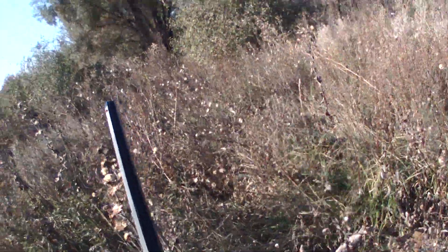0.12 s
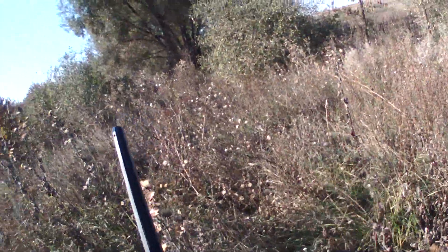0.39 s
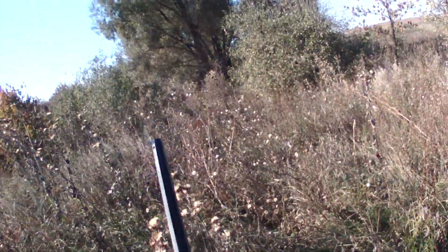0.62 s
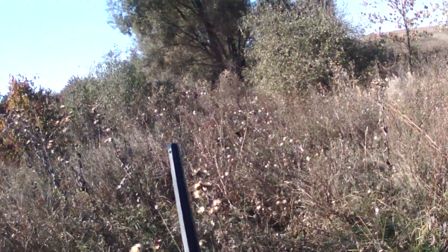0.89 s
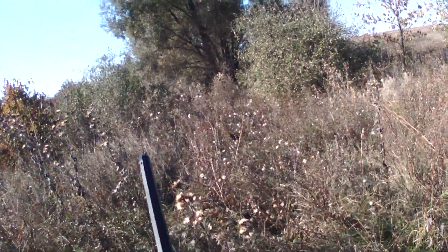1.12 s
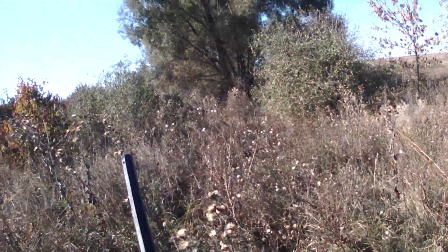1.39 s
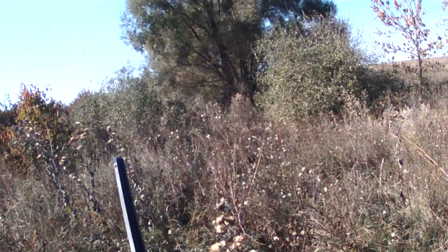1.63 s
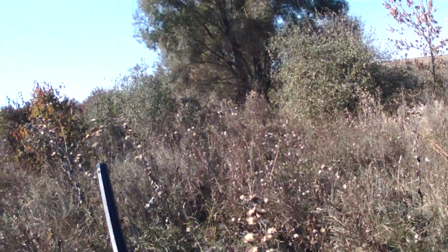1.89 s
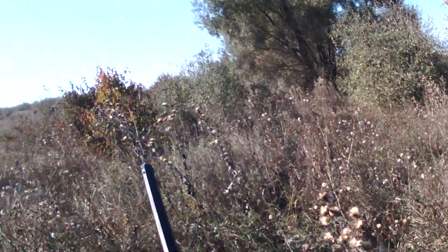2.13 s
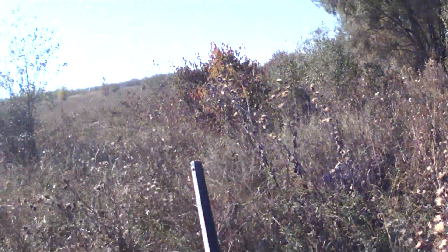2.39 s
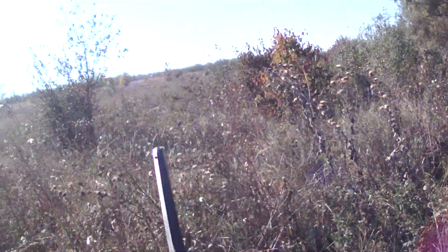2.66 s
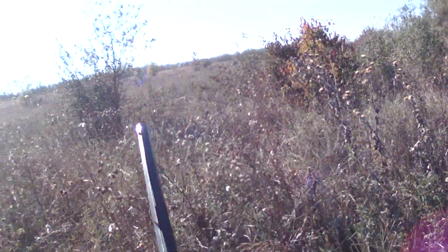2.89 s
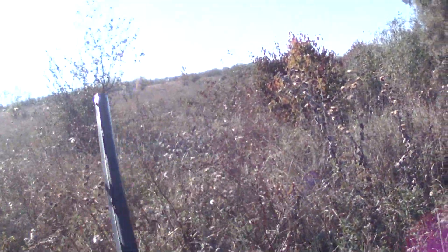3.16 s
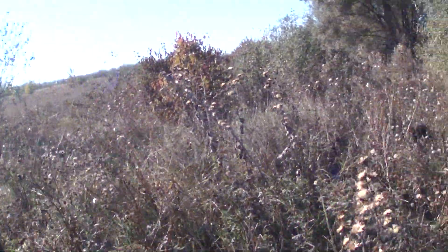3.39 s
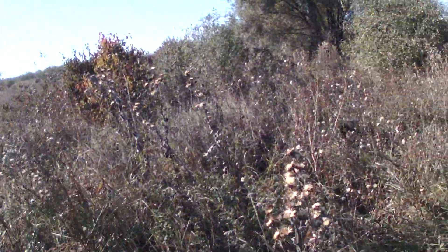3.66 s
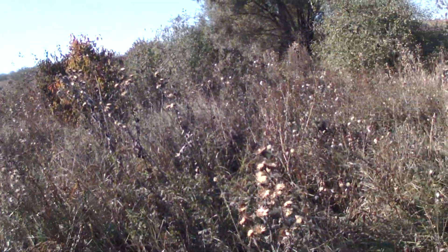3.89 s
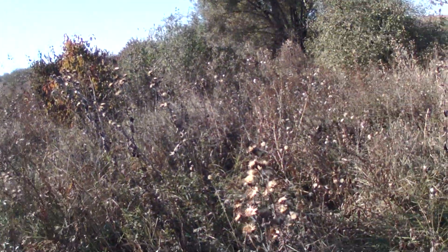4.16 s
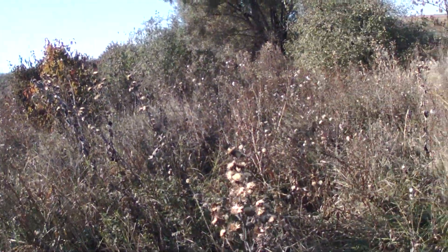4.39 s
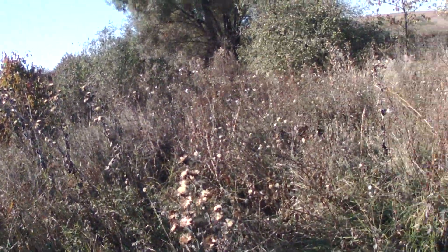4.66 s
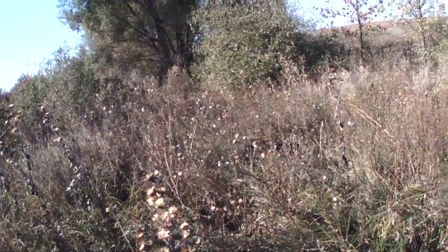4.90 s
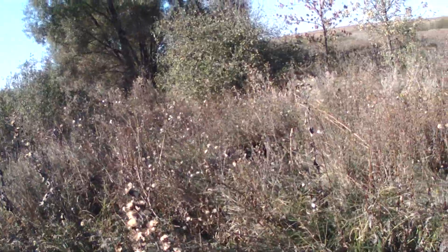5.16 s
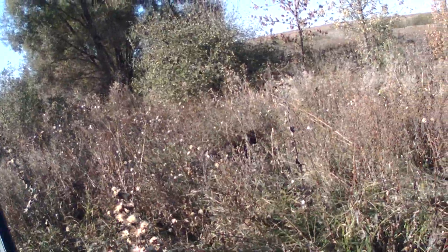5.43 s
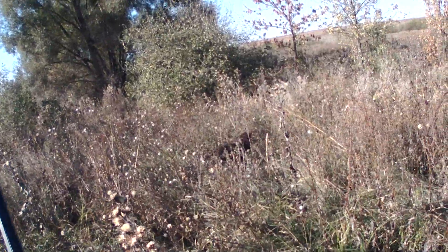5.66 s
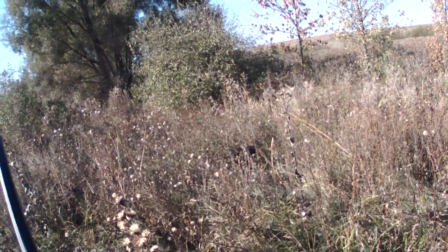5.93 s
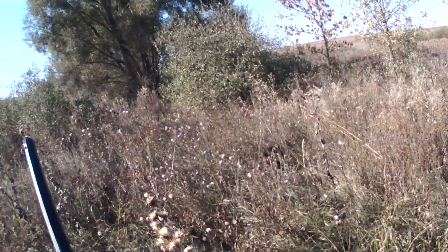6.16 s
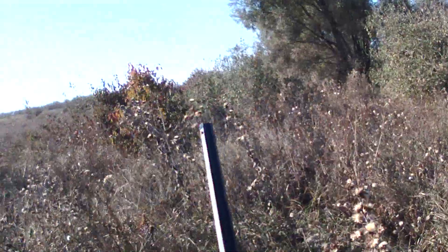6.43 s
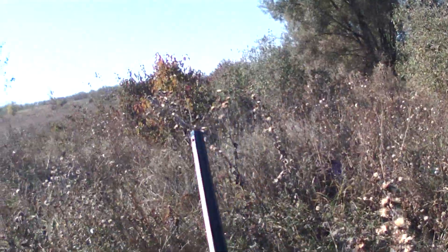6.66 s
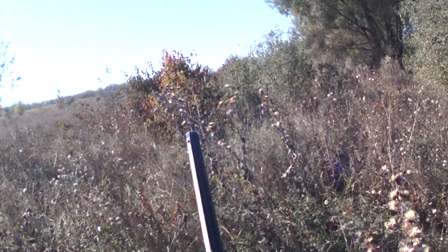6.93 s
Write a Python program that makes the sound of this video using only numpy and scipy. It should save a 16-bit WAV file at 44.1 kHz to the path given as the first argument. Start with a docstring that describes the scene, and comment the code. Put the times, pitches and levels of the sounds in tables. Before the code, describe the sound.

Dry grass and weeds swish and crackle as someone pushes through, stems snapping sharply, with a few hard knocks on the microphone case.

```python
"""Dry blades brush and crackle in dense grains as someone pushes on foot through tall grass in open country.
Stems snap close by, and now and then something knocks the cased microphone worn on the body.
Brushing is shaped noise under random contact grains, snaps are short noise bursts with a ring,
knocks are clicks ringing the case, and faint low air lies beneath.
The case lifts 1-3 kHz, the microphone port lifts the top treble; both channels are nearly alike."""
import sys
import numpy as np
from scipy import signal
from scipy.fft import rfft, irfft
from scipy.io import wavfile
from scipy.ndimage import uniform_filter1d

SR = 44100
rng = np.random.default_rng(int(sys.argv[2]) if len(sys.argv) > 2 else 0)


def unload_wav(signal):
    """Save mono or channel-first audio to the path in sys.argv[1] as 16-bit WAV at rate SR, clipped to [-1, 1]."""
    wavfile.write(
        sys.argv[1],
        SR,
        np.round(np.clip(np.atleast_2d(signal).T, -1, 1) * 32767).astype(np.int16),
    )


def ratio(d):
    """dB to gain"""
    e = np.asarray(d, float) / 20
    return 10 ** e


N = 310905

# spectrum of grass heard through the case: frequency_hz, relative_density_db
THROUGH_CASE = [(18, -68.5), (30, -47), (59, -15.5), (95, -18), (247, -19), (337, -18.5), (667, -16),
                (1100, 2.5), (1270, 1), (2210, -4), (2780, -1), (3140, -2.5), (3790, -19.5), (4200, -18.5),
                (5460, -30.5), (9240, -120)]


def rms_one(x):
    """Scale to rms 1."""
    return x / np.sqrt(np.mean(x ** 2) + 1e-20)


def response(points, size=2048):
    """Causal (minimum-phase) impulse response of a spectrum, energy 1."""
    hz, db = np.transpose(points)
    grid_hz = np.maximum(np.arange(size // 2 + 1) * SR / size, 1)
    log_gain = np.log(ratio(np.interp(np.log(grid_hz), np.log(hz), db)))
    cepstrum = irfft(log_gain)
    # folding the cepstrum onto its first half gives minimum phase
    cepstrum[1:size // 2] *= 2
    cepstrum[size // 2 + 1:] = 0
    out = irfft(np.exp(rfft(cepstrum)))
    return out / np.sqrt(np.sum(out ** 2))


def drift(rate_hz):
    """Slow random curve of spread 1: noise through two equal poles, drawn at every 40th sample."""
    r = np.exp(-80 * np.pi * rate_hz / SR)
    noise = rng.standard_normal(N // 40 + 2002)
    slow = signal.lfilter([1], [1, -2 * r, r * r], noise)[2000:]  # the start has settled
    return np.interp(np.arange(N) / 40, np.arange(len(slow)), rms_one(slow))


def ring(x, hz, t60_s):
    """A resonance: a unit click sets a decaying sine of height 1 ringing."""
    r = ratio(-60 / (t60_s * SR))
    w = 2 * np.pi * hz / SR
    return signal.lfilter([0, np.sin(w)], [1, -2 * r * np.cos(w), r * r], x)


def add(out, start_s, sound, peak_db):
    """Mix a short sound in at a time, scaled to a peak."""
    i = round(start_s * SR)
    scaled = ratio(peak_db) * sound / np.abs(sound).max()
    out[i:i + len(sound)] += scaled[:N - i]


def vigour():
    """Levels in dB of stalks and tips: the rustle plus every sweep, added as power."""
    # steady rustle of the grass all round, fading as the walk slows: time_s, stalks_db, tips_db
    rustle = [(0.0, -48, -43.5), (0.8, -44.5, -40), (1.3, -45.5, -37), (1.74, -55.5, -47), (2.3, -48, -37),
              (2.95, -46.5, -39.5), (3.5, -49.5, -42.5), (3.95, -50.5, -45.5), (4.25, -50.5, -44.5),
              (4.9, -55, -50), (5.9, -53, -50), (6.5, -57, -52), (7.05, -58, -56.5)]
    # leg or arm through a clump, swelling and letting go: peak_s, swell_s, release_s, stalks_db, tips_db
    sweeps = [(0.09, 0.2, 0.12, -43.5, -45), (0.15, 0.15, 0.058, -62, -35.5),
              (0.35, 0.063, .06, -44.5, -53), (0.56, .03, 0.083, -45, -42), (0.69, 0.11, 0.055, -37, -32),
              (0.87, 0.18, 0.048, -43.5, -43.5), (1.0, 0.068, 0.058, -59, -41),
              (1.14, 0.095, 0.087, -41, -33.5), (1.6, 0.21, 0.17, -43.5, -32),
              (1.83, 0.13, 0.26, -46.5, -37), (2.07, 0.12, 0.09, -43.5, -28.5),
              (2.18, 0.047, 0.082, -47.5, -34), (2.46, 0.04, .15, -51, -34.5),
              (2.66, 0.057, 0.035, -48, -35), (3.2, 0.12, 0.068, -43, -41), (3.33, 0.15, 0.025, -48, -47),
              (3.45, 0.02, 0.075, -50.5, -40), (3.79, .2, 0.15, -44.5, -36.5),
              (4.04, 0.055, 0.03, -48, -42.5), (4.42, 0.08, 0.1, -45, -38.5),
              (4.61, 0.19, 0.099, -46, -43.5), (4.81, 0.12, 0.027, -55.5, -49.5),
              (5.0, 0.02, 0.087, -52, -47), (5.24, 0.13, 0.097, -49, -49.5), (5.54, 0.12, 0.082, -52, -52),
              (5.81, 0.15, 0.025, -54, -55), (6.23, 0.36, 0.095, -51.5, -48.5), (6.4, 0.12, 0.07, -47, -49),
              (6.68, 0.12, 0.07, -56, -48), (6.98, 0.04, 0.13, -71, -56)]
    t = np.arange(0, N, 64) / SR
    times, *levels = np.transpose(rustle)
    power = np.array([ratio(2 * np.interp(t, times, db)) for db in levels])
    for peak_s, swell_s, release_s, *sweep_db in sweeps:
        away = np.where(t < peak_s, (peak_s - t) / swell_s, (t - peak_s) / release_s)
        hump = np.cos(np.pi / 2 * np.clip(away, 0, 1)) ** 2
        power = power + np.outer(ratio(2 * np.array(sweep_db)), hump)
    return [np.interp(np.arange(N) / SR, t, 10 * np.log10(p)) for p in power]


def crackle(per_s, spread_db, decay_s):
    """Envelope of blade contacts: random in time, uneven in size, quick to die."""
    sizes = ratio(spread_db * np.minimum(rng.exponential(1, N), 4))
    born = rng.random(N) < per_s * ratio(3.0 * drift(15)) / SR
    r = np.exp(-1 / (decay_s * SR))
    return rms_one(signal.lfilter([1], [1, -r], sizes * born + 1e-18))


def brushing(stalk_db, tips_db):
    """A smooth swish plus contact grains; stalks, leaves and tips share some grains and have their own."""
    # leaves scraping: frequency_hz, relative_density_db
    leaf_colour = [(2350, -12), (4000, -11), (5180, -4), (5790, -8), (7270, -0.5), (9000, -10.5),
                   (11700, -25), (19800, -120)]
    # finest blade tips, lifted by the port: frequency_hz, relative_density_db
    tips_colour = [(5290, -66), (9000, -21.5), (9970, -16.5), (11000, -5.5), (12500, 1), (14600, 3),
                   (15800, -1)]
    leaf_db = 0.39 * stalk_db + .7 * tips_db - 9  # leaf scrape follows both
    shared = crackle(per_s=130.0, spread_db=11.0, decay_s=0.0049)
    sway = drift(3.66)
    layers = (THROUGH_CASE, stalk_db, .5), (leaf_colour, leaf_db, .3), (tips_colour, tips_db, .3)
    out = 0
    for colour, level_db, own in layers:
        touch = 1 + 0.091 * shared + own * crackle(per_s=140.0, spread_db=4.5, decay_s=0.0037)
        swaying = touch * ratio(1.9 * sway + 0.45 * drift(5.3))
        noise = rms_one(swaying) * rng.standard_normal(N)
        out = out + ratio(level_db) * signal.fftconvolve(noise, response(colour))[:N]
    return out


def snaps(rows):
    """A stem gives way in a short run-up, cracks, and sheds splinters; its hollow rings briefly."""
    # snaps heard through the port: frequency_hz, relative_density_db
    through_port = [(2350, -100), (4000, -37), (5200, -3.5), (5700, -17), (6580, -18), (7250, -6),
                    (7950, -8), (8860, -42), (10100, -10), (11100, 3), (12300, 3), (14800, 12), (15700, 1)]
    husk_hz, husk_t60_s = 7250, 0.0031  # dry leaf sheath tearing with a snap
    out, t = np.zeros(N), np.arange(2048) / SR
    body, port = response(THROUGH_CASE), response(through_port)
    deep = signal.butter(2, 450., fs=SR, output="sos")
    crack = round(.0016 * SR)
    fibres = rng.standard_normal((len(rows), 3, len(t)))
    for (start_s, stalk_db, treble_db, hz, t60_s), (low, high, puff) in zip(rows, fibres):
        after = np.maximum(t - t[crack], 0)
        run_up = np.minimum(t / t[crack], 1) ** 3.8
        splinters = 0.024 * ratio(-60 * after / (8.6 * t60_s))
        shape = run_up * (ratio(-60 * after / t60_s) + splinters)
        low[crack:crack + 4], high[crack] = 3.0, 4.0  # the break itself is one hard edge
        # a thin stem radiates little below its ring
        thin = signal.butter(2, 1.27 * hz, "high", fs=SR, output="sos")
        stem = signal.sosfilt(thin, low * shape)
        hollow = rms_one(ring(stem, hz, .007))
        stem = rms_one(signal.fftconvolve(stem, body))[:len(t)] + 1.1 * hollow
        add(out, start_s, stem, stalk_db)
        add(out, start_s, signal.fftconvolve(high * shape, port)[:len(t)], treble_db)
        husk = ring(np.diff(puff * shape), husk_hz, husk_t60_s)
        add(out, start_s, husk, 1.38 * treble_db - 11)
        # air pushed at the port, stronger for bright and for long snaps
        puff_db = 1.54 * treble_db - 35.5 + 400. * min(t60_s, .025)
        add(out, start_s, signal.sosfilt(deep, puff * shape), puff_db)
    return out


def twigs(stalk_db, tips_db):
    """Rows of small snaps at random moments, their peaks set above the brushing of that moment."""
    count, spread_db, t60_s = 30, 4, 0.0059
    low_hz, high_hz = 1120, 2870
    when, pitch, low, high = rng.random((count, 4)).T
    i = (when * (N - 1)).astype(int)
    stalk_peak_db = stalk_db[i] + 10 + spread_db * (2 * low - 1)
    treble_peak_db = tips_db[i] + 19.5 + spread_db * (2 * high - 1)
    ring_hz = low_hz * (high_hz / low_hz) ** pitch
    return [*zip(i / SR, stalk_peak_db, treble_peak_db, ring_hz, np.full(count, t60_s))]


def knocks():
    """A rounded touch and its rebound ring the modes of the case; a hard contact also ticks."""
    # knocks on the case: start_s, peak_db, rebound_delay_ms, hardness_hz, tick_under_peak_db
    case_knocks = [(0.609, -19.5, 2.1, 1190, -45), (2.147, -6, 2.087, 2550, -48),
                   (6.2852, -1.5, 2.085, 3030, -14)]
    # modes of the case: frequency_hz, relative_level_db, t60_s
    case_modes = [(514, -22.5, .03), (965, -4.5, 0.022), (1570, -7, 0.022), (1870, -10.5, 0.0074),
                  (2340, -1, 0.0094), (2700, -5.5, 0.014), (2785, -6, 0.013), (3150, 4.5, 0.012)]
    out = np.zeros(N)
    high_pass = signal.butter(2, 600., "high", fs=SR, output="sos")
    for start_s, peak_db, later_ms, hard_hz, tick_db in case_knocks:
        touch = np.zeros(2048) + 1e-18
        touch[[0, 14, 14 + int(later_ms * SR / 1000)]] = -.3, 1.0, .6  # graze, blow, rebound
        soft = signal.butter(3, hard_hz, fs=SR, output="sos")
        touch = signal.sosfilt(soft, touch)
        rings = 0
        for k, (hz, db, t60_s) in enumerate(case_modes):
            # the two lowest modes move in step, which leaves a gap between them; the rest alternate
            rings = rings + (-1) ** max(k, 1) * ratio(db) * ring(touch, hz, t60_s)
        add(out, start_s, signal.sosfilt(high_pass, rings), peak_db)
        # the knocked case also rattles
        rattle = rng.standard_normal(2048) * ratio(-60 * np.arange(2048) / SR / 0.022)
        rattle = signal.fftconvolve(signal.sosfilt(soft, rattle), response(THROUGH_CASE))[:2048]
        add(out, start_s, rattle, peak_db - 7.5)
        # the jolt pushes the capsule, more in a hard contact
        add(out, start_s + 0.001, np.hanning(60), peak_db + 0.46 * tick_db - 21.0)
        add(out, start_s + 0.00116, np.hanning(4)[1:-1], peak_db + tick_db)  # tick
    return out


def air():
    """Faint lumpy low noise of air at the port."""
    # low air movement: frequency_hz, relative_density_db
    air_colour = [(12, -32), (20, -4.5), (129, -41.5), (307, -29), (376, -29.5), (718, -25.5), (800, -25),
                  (1040, -51), (1760, -120)]
    noise = ratio(6.4 * drift(14)) * rng.standard_normal(N)
    return ratio(-69) * rms_one(signal.fftconvolve(noise, response(air_colour, size=8192))[:N])


def scene():
    """All sources on one capsule; a faint left-right difference flickers on and off, following the loudness."""
    # stem snaps: start_s, stalk_peak_db, treble_peak_db, ring_hz, t60_s
    stem_snaps = [(0.108, -37, -20.5, 1140, .012), (0.1413, -53, -19, 2260, 0.03),
                  (0.2272, -52, -17.5, 1890, 0.017), (0.262, -32, -16.5, 1130, 0.018),
                  (0.2778, -21.5, -17, 980, 0.033), (0.425, -28, -18, 1240, .0094),
                  (0.537, -8.5, -6, 3200, 0.028), (0.5668, -41, -19, 1140, .012),
                  (0.64, -22, -36, 1260, 0.012), (0.992, -42, -16.5, 1110, 0.012),
                  (1.1266, -9.5, -2.5, 2570, 0.015), (1.1426, -16.5, -6.5, 1290, 0.0086),
                  (1.1548, -9.5, -2.5, 3070, 0.02), (1.4232, -21, -30, 1170, 0.015),
                  (1.491, -26, -36, 1030, 0.0081), (1.6048, -28.5, -10.5, 2210, 0.0054),
                  (1.7792, -31.5, -13.5, 3230, 0.0038), (2.0598, -21.5, -7.5, 2560, 0.02),
                  (2.0685, -34, -12, 2660, 0.0076), (2.088, -23.5, -6, 2750, 0.0072),
                  (2.7313, -40, -38, 3200, .012), (3.1882, -26, -17.5, 3140, 0.021),
                  (3.2158, -25.5, -26, 2650, 0.023), (3.4534, -47, -24, 3140, .012),
                  (3.8038, -20.5, -13.5, 2600, .018), (3.845, -24.5, -20, 2650, 0.011),
                  (3.8568, -23.5, -23, 2430, 0.0042), (4.043, -32, -20, 2590, 0.0055),
                  (4.0608, -27, -44, 2060, 0.0071), (4.365, -37, -22, 2540, .015),
                  (4.3765, -29.5, -21.5, 3230, .018), (4.4337, -15.5, -17, 2650, 0.01),
                  (4.5999, -36, -19.5, 3150, .015), (4.8942, -26, -18.5, 2630, 0.011),
                  (4.994, -26, -23, 2440, 0.0089), (5.2172, -29, -42, 1730, .012),
                  (5.2536, -32.5, -48, 1060, 0.0082), (5.342, -30.5, -32, 1610, .0075),
                  (5.6103, -27, -31, 1490, 0.016), (6.2544, -35, -36, 2640, .013),
                  (6.3165, -35, -36, 2670, 0.017), (6.363, -27, -27.5, 3200, .044),
                  (6.4222, -22.5, -20.5, 2650, 0.033)]
    # where left and right differ: frequency_hz, relative_density_db
    apart_colour = [(710, -84), (1200, -59), (2040, -17), (3130, 8.5), (4460, -21), (5770, -19),
                    (7010, -40), (7940, -25), (10000, -29), (13000, -77), (22000, -120)]
    levels = vigour()
    mid = brushing(*levels) + snaps(stem_snaps + twigs(*levels)) + knocks() + air()
    loud = np.sqrt(np.abs(uniform_filter1d(mid ** 2, size=400)))
    flicker = loud * (drift(14) > .3)
    noise = flicker * rng.standard_normal(N)
    side = ratio(-32) * signal.fftconvolve(noise, response(apart_colour))[:N]
    return mid + side * [[1], [-1]]


def low_pass(x):
    """Removes everything above the highest recorded frequency."""
    return signal.sosfilt(signal.butter(12, 16980, fs=SR, output="sos"), x)


def record(dry):
    """The microphone overloads softly, rounding the loudest peaks, and the top is cut steeply at 15.8 kHz."""
    overload = .8
    rounded = overload * np.tanh(dry / overload)
    steep = signal.ellip(10, .5, 65, 15800, fs=SR, output="sos")
    mix = signal.sosfilt(steep, rounded)
    return low_pass(mix)


dry = scene()
out = record(dry)
unload_wav(out)
```